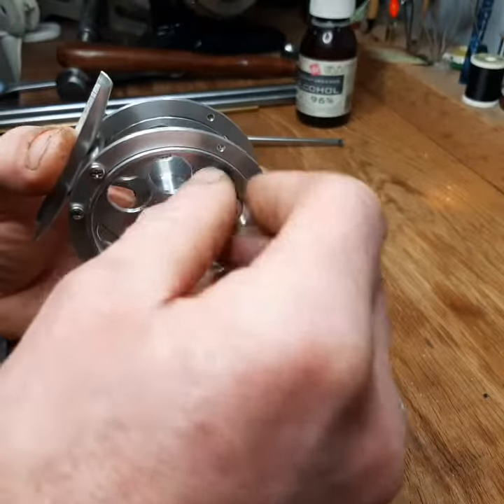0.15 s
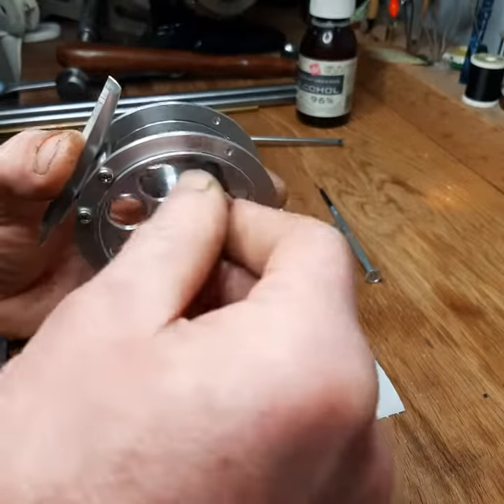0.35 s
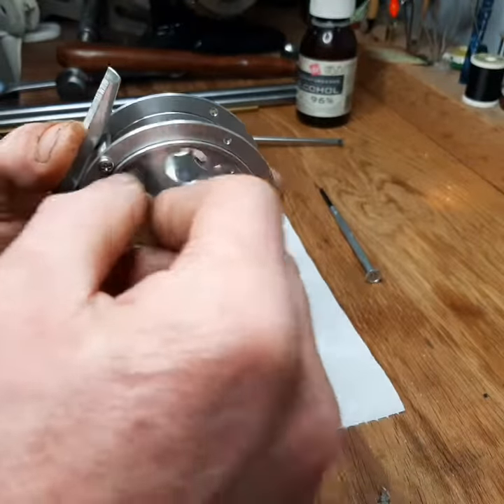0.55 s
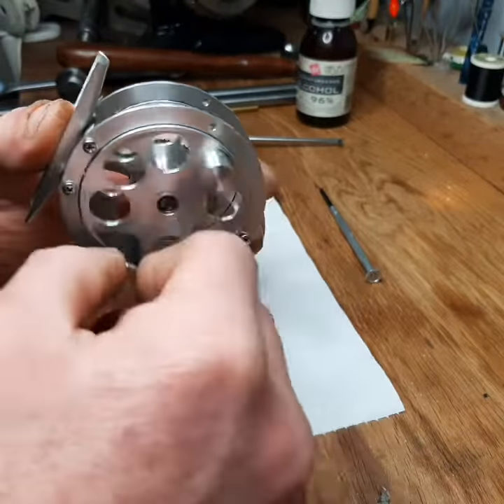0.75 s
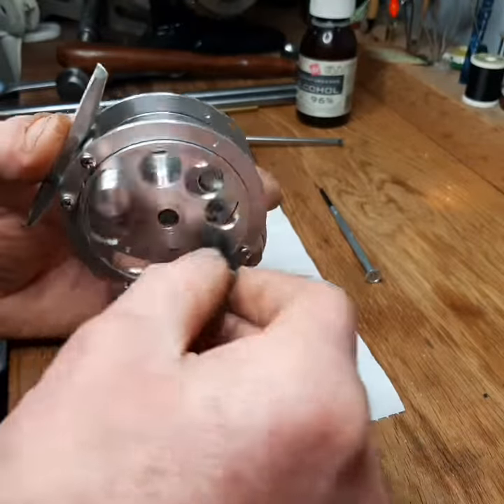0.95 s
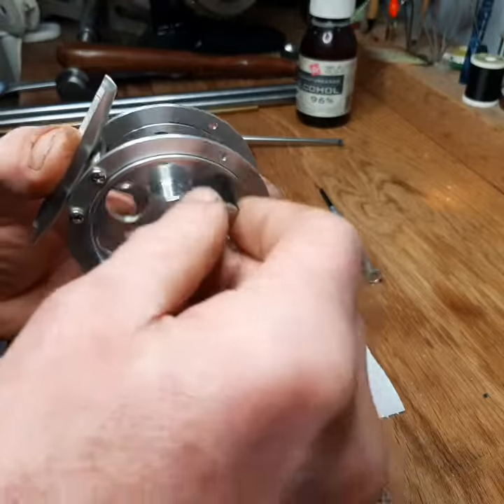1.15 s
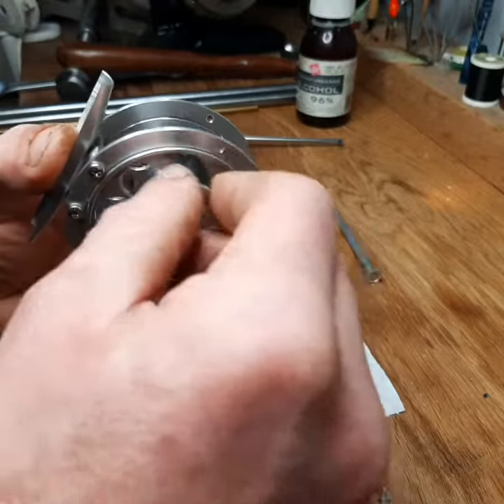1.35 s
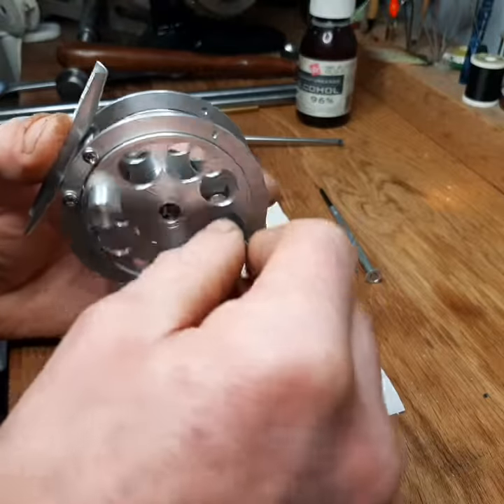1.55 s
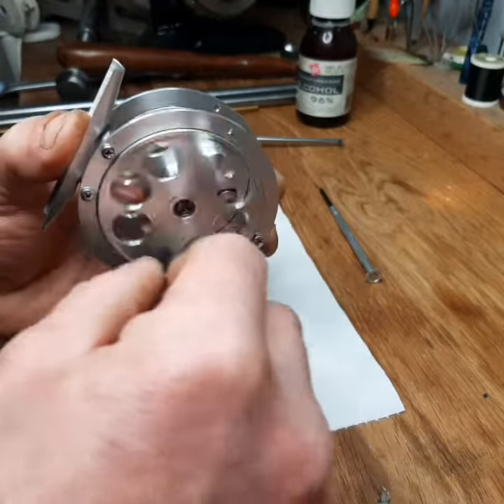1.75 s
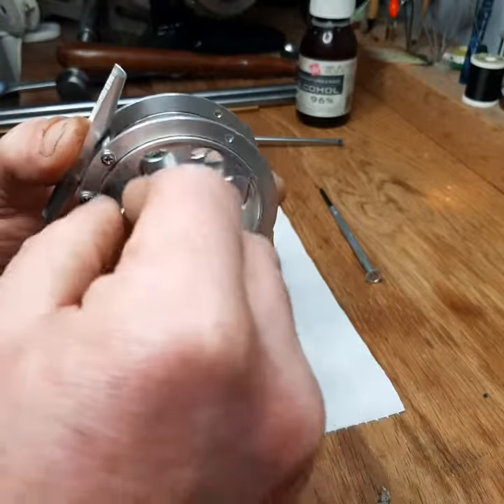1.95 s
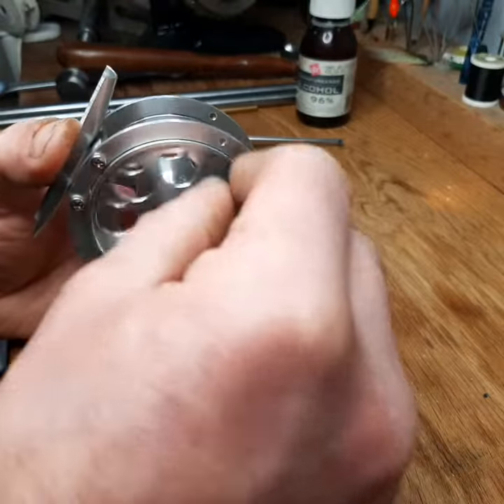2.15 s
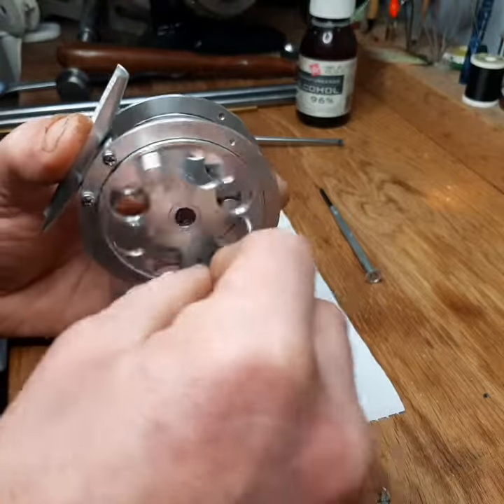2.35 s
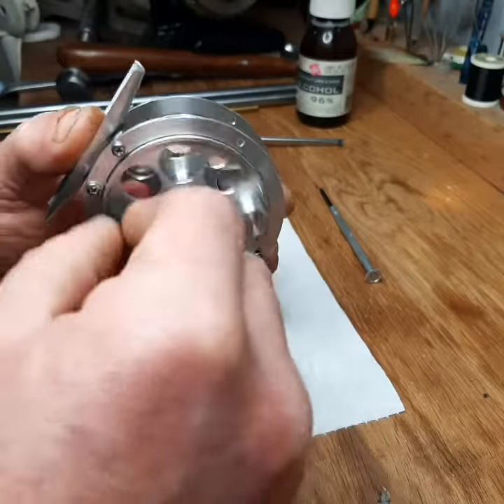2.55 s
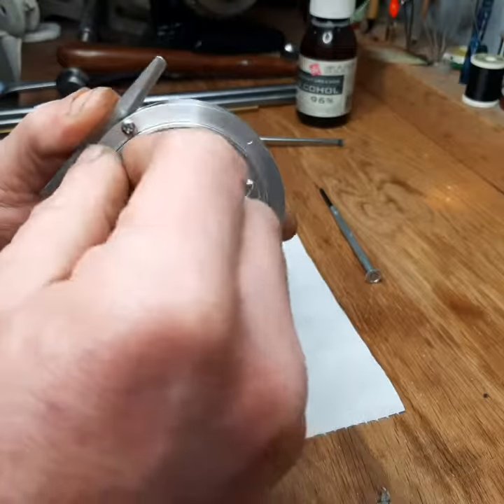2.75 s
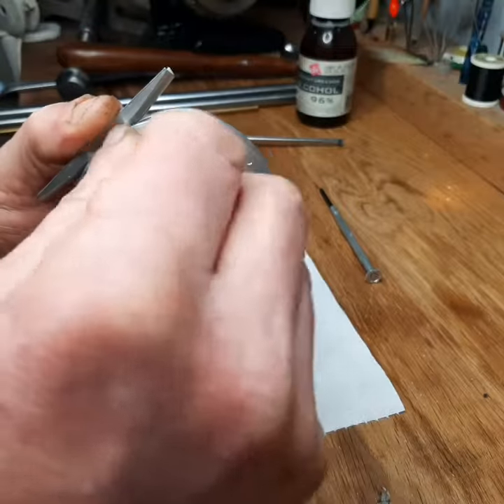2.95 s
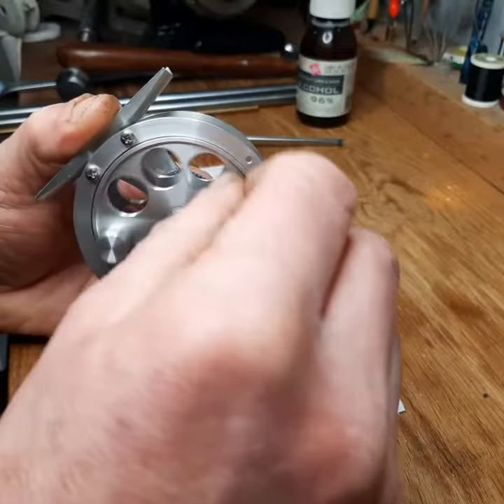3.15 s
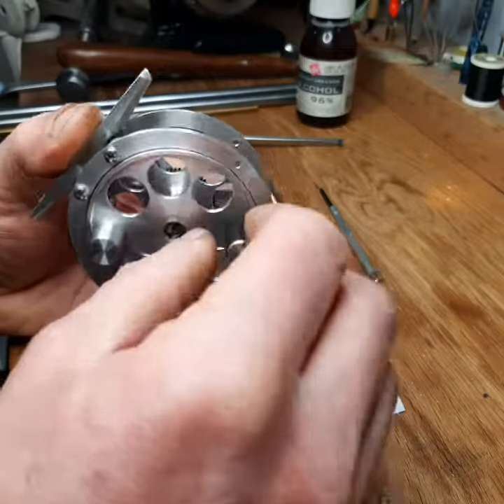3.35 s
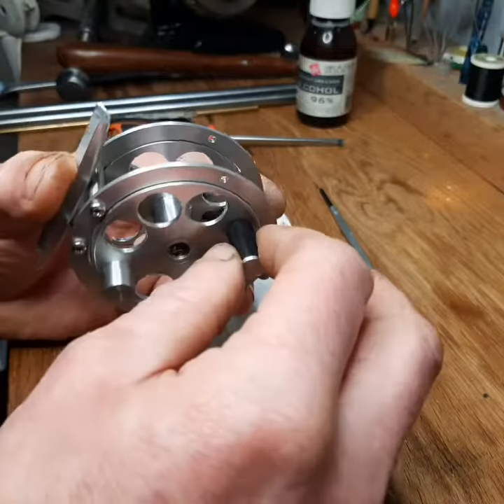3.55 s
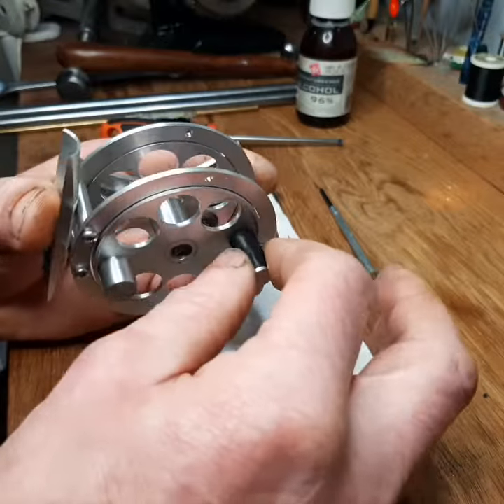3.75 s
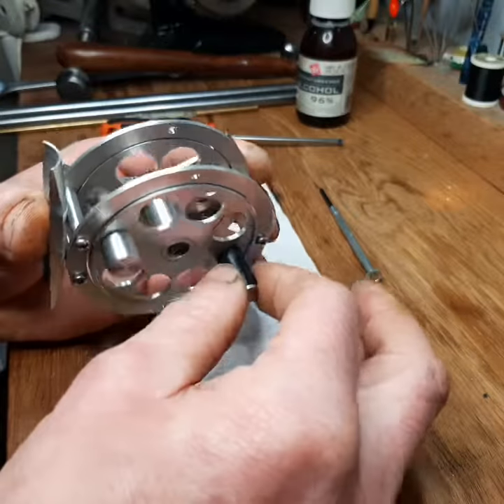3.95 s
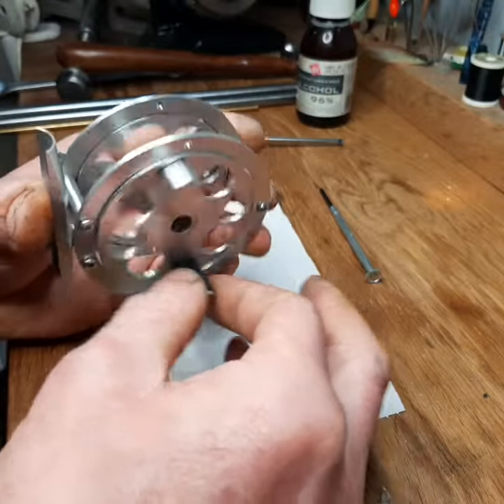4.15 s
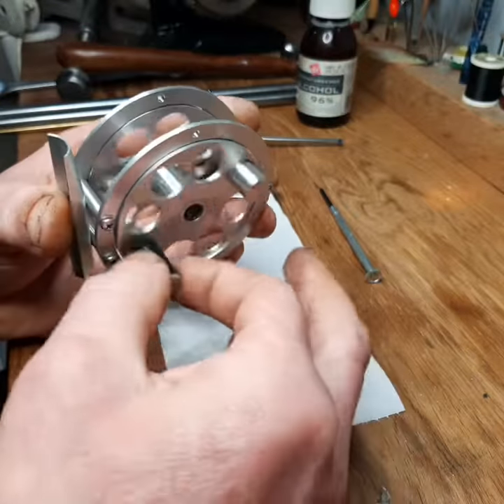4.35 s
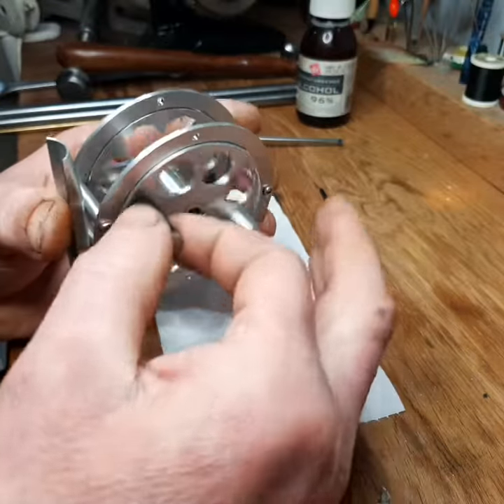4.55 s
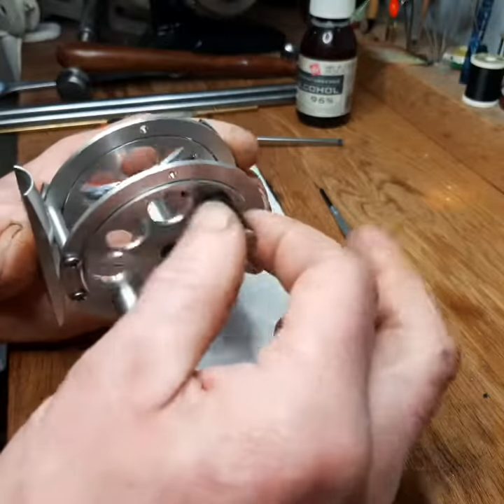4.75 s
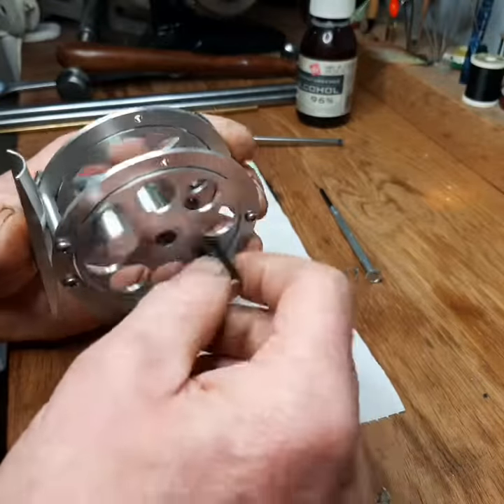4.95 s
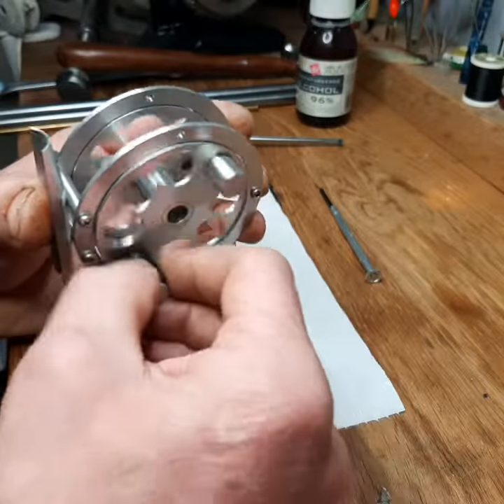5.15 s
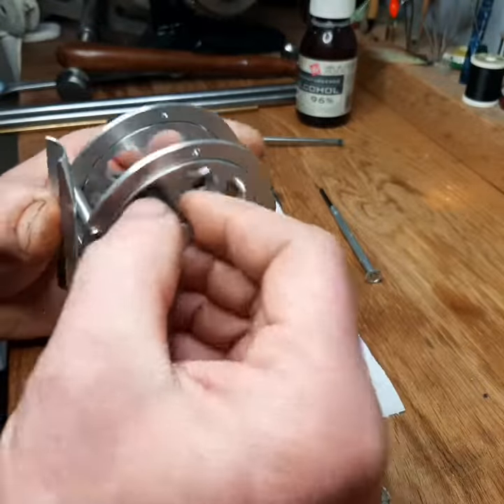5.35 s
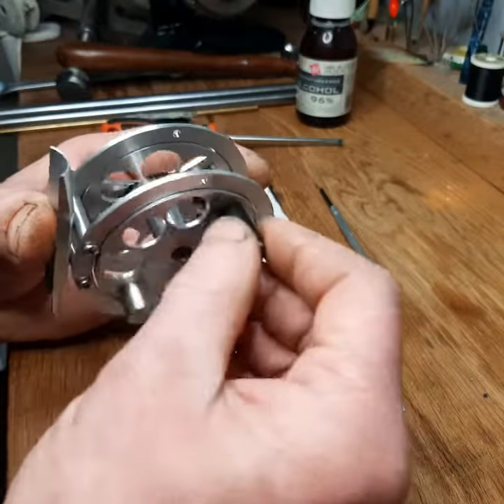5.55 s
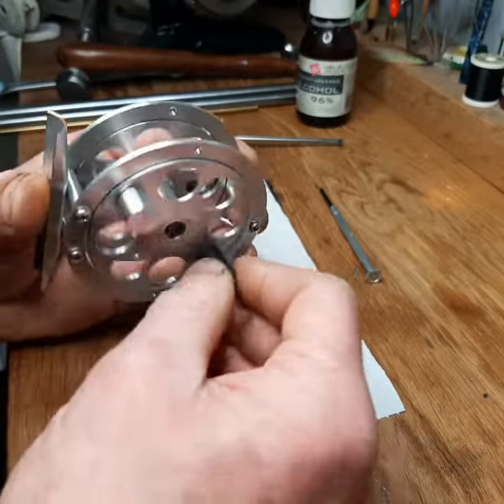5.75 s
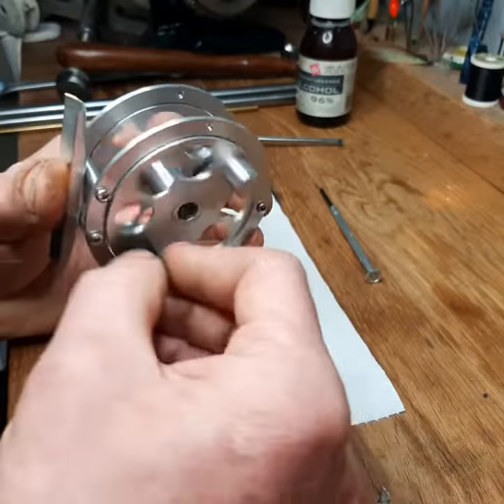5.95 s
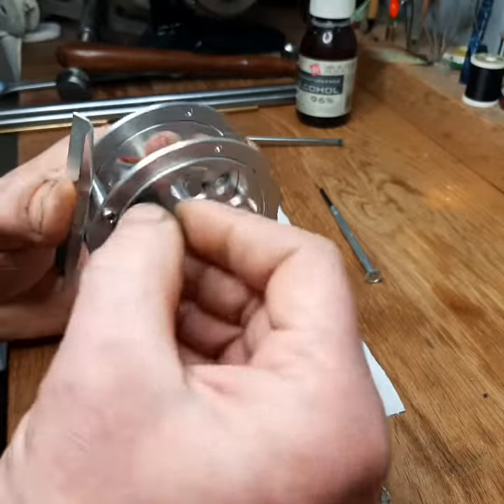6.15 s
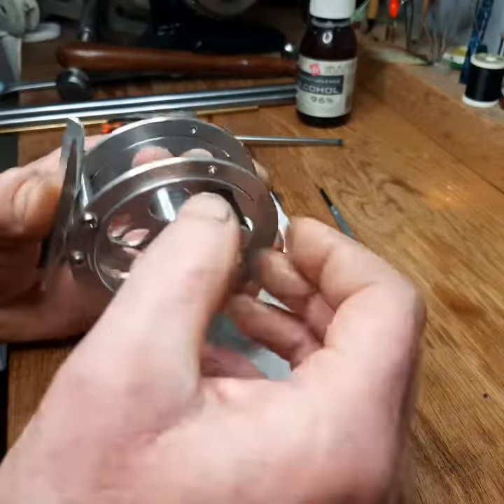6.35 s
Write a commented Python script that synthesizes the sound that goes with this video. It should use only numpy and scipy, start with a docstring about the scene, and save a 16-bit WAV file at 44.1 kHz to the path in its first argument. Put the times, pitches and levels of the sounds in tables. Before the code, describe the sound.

Close stereo pickup of a metal fishing reel wound by hand in short pushes. Its sprung pawl makes crisp, bright clicks that merge into brief buzzes. Two opening bursts, two lone ticks, then nearly continuous pushes, a pause, two more bursts and a slow creep of sparse ticks. Winding resumes, ringing more openly and growing louder at the end. A small workshop adds a short, noisy reverberation over very low rumble.

```python
"""A metal fly reel, held in one hand close to two microphone ports, is wound in short pushes.
Its sprung pawl drops off every ratchet tooth: single ticks when the spool creeps, a buzz when it spins.
After two pushes and two lone ticks come pushes up to 2.8 s, two more by 3.3 s, then a creep of sparse ticks.
From 4 s the pushes resume; the frame, struck by each drop, rings more freely as the fingers uncover it.
Throughout, the grip changes the colour, a small workshop answers with decaying noise, and rumble and hum stay low."""
import sys
import numpy as np
from scipy import signal
from scipy.fft import rfft, irfft, next_fast_len
from scipy.io import wavfile
from scipy.ndimage import uniform_filter1d

SR = 44100
rng = np.random.default_rng(int(sys.argv[2]) if len(sys.argv) > 2 else 0)


def log_audio(samples):
    """Write samples as a 16-bit WAV file to the path given in sys.argv[1]."""
    # one column per channel
    frames = np.atleast_2d(samples).T
    # limit to full scale, then quantise
    limited = np.clip(frames, -1, 1)
    pcm = np.round(limited * 32767).astype(np.int16)
    wavfile.write(sys.argv[1], SR, pcm)


N = 286650
CLICK_SIZE, LEAD_SIZE = 1024, 128  # samples in a click, and those of them before the pawl lands

# fingers on the spool's face damp and hide it; turned by its knob it rings freely, in the open:
# (t/s, ring level/dB)
OPENNESS = [(1.35, -6), (1.6, -2), (2.75, -2), (3.2, -4), (3.8, 4), (4.6, 4), (4.85, -1), (5.1, 6),
            (6.1, 6), (6.35, 3)]


def amp(db):
    """Level to amplitude ratio: 20 dB is a factor of ten."""
    return 10 ** (np.asarray(db) / 20)


def unit(x):
    """Normalisation to an RMS of one."""
    return x / np.sqrt(np.mean(x ** 2) + 1e-20)


def along(points, hz):
    """Spectral envelope: linear interpolation of (f/Hz, value) points on a logarithmic frequency axis."""
    f, v = np.transpose(points)
    return np.interp(np.log(hz + 1), np.log(f + 1), v)


def curves(rows, s):
    """Slow control: linear interpolation in time of every column of a table."""
    knots, *columns = np.transpose(rows)
    return [np.interp(s, knots, column) for column in columns]


def bell(hz, centre_hz, octaves):
    """Resonance-like band: a Gaussian on the octave scale."""
    return np.exp(-(np.log2((hz + 1) / centre_hz) / octaves) ** 2)


def filtered(x, response):
    """Linear filtering: the spectrum is multiplied by a response of frequency."""
    m = next_fast_len(N + SR // 2)
    return irfft(rfft(x, m) * response(np.fft.rfftfreq(m, 1 / SR)), m)[..., :N]


def causal(db):
    """Minimum phase: folding the cepstrum of these gains gives a response that does not precede its cause."""
    cepstrum = irfft(np.log(amp(db)))
    return np.exp(rfft(2 * cepstrum[..., :CLICK_SIZE // 2], CLICK_SIZE) - cepstrum[..., :1])


def background(bass_side_db, hiss_side_db):
    """Stationary noise: rumble nearly alike at both ports, a thin hiss that differs more, and a two-tone hum."""
    # the quiet workshop's spectrum: (f/Hz, relative level per Hz/dB)
    hush = [(25, -36), (45, -3.5), (68, -2.5), (120, -3), (160, -11), (225, -5.5), (280, -15.5), (600, -19),
            (1000, -21.5), (3000, -24.5), (8000, -31), (15500, -22.5)]
    # steady tones: (f/Hz, RMS level/dB)
    hum_tones = [(107, -101), (187, -94)]
    hush_db = -79  # RMS level of the part common to both ports

    mid, side = filtered(rng.standard_normal((2, N)), lambda hz: amp(along(hush, hz)))
    side_gains = [(120, bass_side_db), (400, hiss_side_db)]  # (f/Hz, gain/dB)
    side = filtered(unit(side), lambda hz: amp(along(side_gains, hz)))
    t = np.arange(N) / SR
    hum = 0
    for hz, db in hum_tones:
        hum = hum + amp(db) * np.sqrt(2) * np.sin(2 * np.pi * (hz * t + rng.random()))
    return amp(hush_db) * (unit(mid) + np.array([side, -side])) + hum


def workshop(x, delay, count=10):
    """Reverberation: noise tails decay by frequency and crossfade at equal power as reel and hands move."""
    # decay of the room: (f/Hz, t60/s)
    decay = [(200, 0.69), (1000, 0.093), (4000, 0.31), (8000, 0.25), (15000, 0.27)]
    # sound sent back by the walls: (f/Hz, relative level/dB)
    walls = [(300, 11.5), (1200, 11), (2700, 7), (4300, 0), (8000, 2), (15000, -9)]

    wet = np.zeros((2, N + SR))
    place = np.linspace(0, count - 1, N)
    for k in range(count):
        hz, t, z = signal.stft(rng.standard_normal((2, SR // 3)), SR, nperseg=256)
        tail_db = along(walls, hz)[:, None] - 60 * t / along(decay, hz)[:, None]
        tail = signal.istft(z * amp(tail_db), SR)[1]
        tail_t = np.arange(tail.shape[1]) / SR
        tail *= 1 - np.exp(-(tail_t / delay) ** 2)  # reflections build up after the direct sound
        tail /= np.linalg.norm(tail[0])
        near = np.flatnonzero(abs(place - k) < 1)
        share = np.cos(np.pi / 2 * (place[near] - k))
        answer = signal.fftconvolve(x[:, near] * share, tail, axes=1)
        wet[:, near[0]:near[0] + answer.shape[1]] += answer
    return wet[:, :N]


def drifting(shape, memory):
    """First-order Markov chance: a share of each value is kept from one tooth (first axis) to the next."""
    fresh = rng.standard_normal(shape)
    fresh[1:] *= np.sqrt(1 - memory ** 2)  # the variance stays one
    return signal.lfilter([1], [1, -memory], fresh, axis=0)


def at_ports(count, size, memory, apart):
    """Partial coherence: drifting chance in a part common to two ports and a part of each port's own."""
    common = drifting((count, 1, size), memory)
    own = drifting((count, 2, size), memory)
    return np.cos(apart) * common + np.sin(apart) * own


def teeth():
    """Ratchet kinematics: time and level of every pawl drop follow the turning of the spool."""
    # pushes of the winding hand; surge = how much the spool speeds up mid-push, lean > 0 = it ends faster
    # than it starts: (start t/s, length/s, teeth passed, surge 0-1, lean -1 to 1,
    # mid-push click level/dB, swell over the push/dB)
    pushes = [(0.0118, 0.0671, 6, 0.12, 0.5, -36.5, -0.1), (0.0886, 0.1653, 14, 0.01, -0.39, -37.9, -2.6),
              (0.5963, 0.1009, 8, 0.33, 0.45, -35.7, 4.4), (0.7133, 0.1481, 12, 0.1, 0.23, -36.3, 0.3),
              (0.8767, 0.1606, 13, 0.17, 0.09, -39.2, -3.7), (1.054, 0.1311, 9, 0.19, -0.18, -40.3, 2.6),
              (1.2029, 0.1036, 9, 0.22, 0.27, -37.6, 3.9), (1.3238, 0.067, 5, 0.06, 0.31, -37.1, 4.5),
              (1.5073, 0.0833, 7, 0.29, 0.48, -40.2, 2.2), (1.6039, 0.1114, 9, 0.14, 0.09, -41.8, -0.3),
              (1.7308, 0.0997, 8, 0.07, 0.08, -42.5, 3.1), (1.845, 0.0454, 5, 0.04, 0.09, -39.1, 2.6),
              (1.9022, 0.1129, 9, 0.23, -0.16, -37.0, 1.4), (2.0303, 0.1889, 15, 0.2, 0.39, -37.6, -2.3),
              (2.2298, 0.0689, 7, 0.02, -0.17, -38.9, -1.1), (2.311, 0.1088, 11, 0.12, -0.13, -40.9, -2.7),
              (2.4383, 0.1108, 9, 0.16, 0.2, -41.6, 2.8), (2.5624, 0.1969, 14, 0.2, -0.46, -37.1, 3.4),
              (3.0299, 0.0877, 6, 0.16, -0.39, -38.3, 1.1), (3.138, 0.1782, 14, 0.15, -0.11, -38.9, -2.8),
              (3.9833, 0.1387, 6, 0.16, 0.32, -43.2, 0.7), (4.1453, 0.077, 5, 0.07, 0.09, -40.3, 1.4),
              (4.2448, 0.0879, 6, 0.2, 0.03, -38.2, 1.8), (4.3525, 0.0719, 5, 0.02, 0.11, -36.9, 1.1),
              (4.4471, 0.0843, 5, 0.2, 0.06, -36.1, 0.5), (4.5734, 0.136, 7, 0.09, -0.15, -36.2, 0.5),
              (4.7276, 0.0965, 9, 0.11, 0.01, -35.5, 1.5), (4.8365, 0.0978, 10, 0.15, 0.04, -36.3, -2.6),
              (5.0007, 0.0931, 8, 0.15, 0.15, -41.5, 0.9), (5.1079, 0.0877, 7, 0.12, 0.06, -38.7, 2.6),
              (5.2114, 0.0906, 8, 0.14, -0.16, -37.4, 0.8), (5.3167, 0.3087, 22, 0.16, -0.11, -34.9, -0.8),
              (5.659, 0.1129, 8, 0.23, 0.4, -37.8, -0.6), (5.7873, 0.0923, 7, 0.02, -0.03, -39.6, 0.6),
              (5.8949, 0.1394, 11, 0.3, -0.39, -37.0, 3.8), (6.0493, 0.0923, 6, 0.27, -0.62, -36.9, 0.0),
              (6.1625, 0.0964, 7, 0.12, -0.21, -34.1, 0.9), (6.2751, 0.1513, 14, 0.04, -0.2, -33.4, -1.6)]
    # single teeth, as the spool creeps or comes to rest: (t/s, click level/dB)
    ticks = [(0.5174, -44.2), (0.5528, -37.1), (2.7903, -36.1), (2.9958, -43.3), (3.3485, -41.9),
             (3.7794, -48.1), (3.8083, -42.6), (3.8521, -41.6), (3.879, -41.3), (3.904, -48),
             (3.9095, -42.8), (4.9605, -40.1), (5.6407, -34.0)]

    drops = [np.transpose(ticks)]
    for start, length, passed, surge, lean, db, swell_db in pushes:
        turned = np.linspace(0, 1, round(passed))
        elapsed = turned + surge * np.sin(2 * np.pi * turned) / (2 * np.pi)
        elapsed += lean * turned * (1 - turned)
        drops.append([start + length * elapsed, db + swell_db * (turned - .5)])
    drops = np.hstack(drops)
    return drops[:, np.argsort(drops[0])]


def snap(count, t, hz, steel, rattle, scrape, evenness):
    """Impact noise: spectra of each drop's dense, decaying ring, in stages of (level/dB, t60/s)."""
    # steel on steel: (f/Hz, relative level per Hz/dB)
    steel_spectrum = [(200, -34), (740, -35.5), (1030, -13.5), (1450, -16.5), (1750, -19), (2100, -12),
                      (3300, -9.5), (4300, 6.5), (4850, 3.5), (5600, 2.5), (6400, -2.5), (7800, 2.5),
                      (8800, -3), (9500, 3), (10600, 3.5), (11500, 7), (13000, 6), (15800, -5.5),
                      (16500, -44.5)]

    def stage(db, t60):
        return amp(db - 60 * abs(t) / t60)

    # neighbouring teeth sound nearly alike, and so hard a blow excites all frequencies about evenly
    blow = at_ports(count, CLICK_SIZE, memory=0.843, apart=0.67)
    blow = rfft(blow * stage(*steel) * (t >= 0))
    power = abs(uniform_filter1d(abs(blow) ** 2, size=35))
    blow *= (power.mean() / power) ** (evenness / 2)
    # the pawl scrapes over the tooth's tip before it falls, and chatters as it settles
    loose = at_ports(count, CLICK_SIZE, memory=0.28, apart=1.0)
    loose = rfft(loose * np.where(t < 0, stage(*scrape), stage(*rattle)))
    return (blow + loose) * causal(along(steel_spectrum, hz))


def ring(count, t, attack, change_db, slip):
    """Modal synthesis: spectra of the frame's damped modes, struck a little differently by every tooth."""
    # what the reel rings with: (f/Hz, relative level/dB, t60/s)
    frame_modes = [(1253, -36.5, 0.019), (1509, -30.5, 0.03), (2036, -28, 0.018), (2426, -29.5, 0.053),
                   (2765, -15, 0.028), (2998, -18.5, 0.029), (4298, -0.5, 0.016), (5262, -8.5, 0.021),
                   (7790, 0, 0.0069), (8077, 8.5, 0.0057), (10600, -20, 0.023), (12300, -14.5, 0.0076),
                   (14100, -18, 0.01)]

    hz, db, t60 = np.transpose(frame_modes)
    t = np.maximum(t, 0)
    decay = amp(db[:, None] - 60 * t / t60[:, None])
    modes = decay * np.exp(2j * np.pi * hz[:, None] * t) * (1 - np.exp(-t / attack))
    strength = at_ports(count, len(hz), memory=0.78, apart=1.0)
    phase = at_ports(count, len(hz), memory=0.78, apart=1.0)
    strike = amp(change_db * strength) * np.exp(1j * slip * phase)
    return rfft((strike @ modes).imag)


def grip(s, hz):
    """Moving filter: five bands rise and fall as the hands damp, cover and uncover the reel."""
    # (t/s, 1.2 kHz level/dB, 2.6 kHz level/dB, 4.1 kHz level/dB, 8.3 kHz level/dB, 12.9 kHz level/dB)
    band_levels = [(0.05, 1, 1, 2, 3.5, 1), (0.75, 3.5, 0, 0, 1.5, 1), (1.1, 4, 13.5, 7, 9, -3),
                   (1.35, 7.5, 4, -3.5, -1, 3), (1.5, -10, -2.5, 11.5, 2.5, 1),
                   (1.77, 2, 5.5, -1.5, 6.5, -1), (2.02, -9, -6.5, 8, 3.5, 0),
                   (2.14, -3.5, -1, -1, 1, -1.5), (2.34, 7, 8, 0, 6, -0.4), (2.7, -7, -0.5, 10, 4, 3),
                   (3.27, 2, 4, 4.5, -3.5, -0.5), (4.13, -4, -4.5, 0.5, 6.5, -1.5),
                   (4.46, -7.5, -11.5, 5, 2, -1), (4.8, 2.5, 6, -4, 5, 1), (5.2, 0, -1.5, 3.5, 5, -1),
                   (5.43, 1.5, -3.5, 0.5, -7, -3.5), (5.83, 9.5, -1.5, 4.5, 4, -4),
                   (6.0, -4.5, -4, 4.5, -1, 1.5), (6.33, 3.5, 0.5, 1, -8, 0.5)]

    hollow, rim, plate, spring, sheen = curves(band_levels, s)
    db = hollow * bell(hz, 1200, 0.49) + rim * bell(hz, 2610, 0.29)
    db = db + plate * bell(hz, 4130, 0.13) + spring * bell(hz, 8290, 0.11)
    return causal(db + sheen * bell(hz, 12900, 0.28))


def port_difference(hz, open_db, lag):
    """Interaural-style cues: the nearer left port hears the reel earlier and louder."""
    side = np.array([[.5], [-.5]])
    pan_db = 3 + 0.14 * open_db  # left over right, growing with openness
    colour_db = 6.8 * bell(hz, 8020, 0.052) - 2 * bell(hz, 4800, 0.3)
    late = np.exp(-2j * np.pi * hz * (.5 - side) * lag)
    return amp(side * pan_db) * amp(side * colour_db) * late


def ratchet(ring_db, lag, lead, scatter_db):
    """Impact excitation: every drop snaps and rings the reel, coloured by the grip of that moment."""
    s, db = teeth()
    t = (np.arange(CLICK_SIZE) - LEAD_SIZE) / SR
    hz = np.fft.rfftfreq(CLICK_SIZE, 1 / SR)
    moment = s[:, None, None]
    open_db, = curves(OPENNESS, moment)

    snaps = snap(len(s), t, hz, steel=(5, .0105), rattle=(-9, .028), scrape=(-14, .018), evenness=1.0)
    rings = ring(len(s), t, attack=0.00072, change_db=2.2, slip=0.55)  # s, dB, rad
    z = grip(moment, hz) * (snaps + amp(ring_db + open_db) * rings)
    clicks = irfft(z * port_difference(hz, open_db, lag))

    # a click's level is its RMS over the first 5 ms at both ports
    onset = clicks[..., (t > 0) & (t < .005)]
    clicks /= np.sqrt(np.mean(onset ** 2, axis=(1, 2), keepdims=True))
    gains = amp(db + scatter_db * rng.standard_normal(len(s)))
    starts = np.clip((s - lead) * SR - LEAD_SIZE, 0, N).astype(int)
    out = np.zeros((2, N + CLICK_SIZE))
    for start, gain, click in zip(starts, gains, clicks):
        out[:, start:start + CLICK_SIZE] += gain * click
    return out[:, :N]


def scene():
    """Superposition: the close reel, the room's answer and the quiet behind them."""
    reel = ratchet(ring_db=-2.5, lag=0.00013, lead=.00006, scatter_db=0.82)  # lag and lead in s
    # a hand in front of the reel leaves more of its sound to come by way of the room
    open_db, = curves(OPENNESS, np.arange(N) / SR)
    room_db = -10.5 - 0.43 * open_db
    wet = workshop(reel * amp(room_db), delay=0.0027)  # s
    wet = wet * amp([[-1.2], [1.2]])  # the right port hears more of the room
    return reel + wet + background(bass_side_db=-7.5, hiss_side_db=0.0)


def record(dry):
    """Band limitation: nothing from 16.4 kHz upward is kept."""
    return filtered(dry, lambda hz: hz < 16400)


dry = scene()
out = record(dry)
log_audio(out)
```